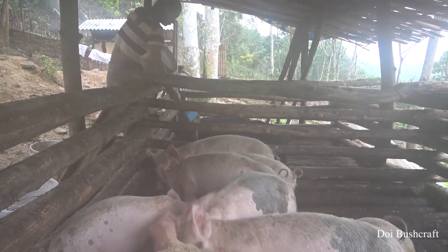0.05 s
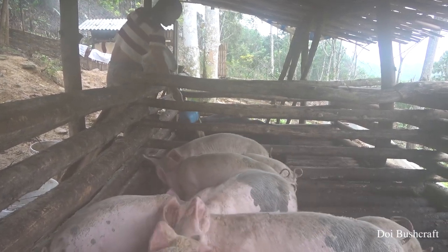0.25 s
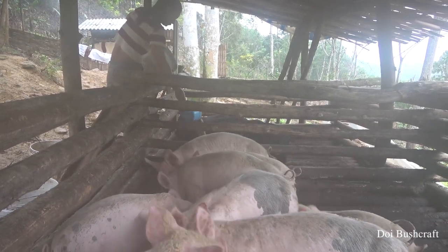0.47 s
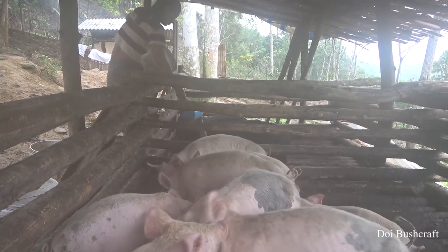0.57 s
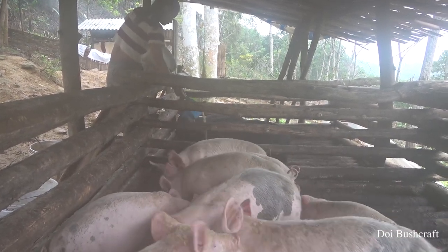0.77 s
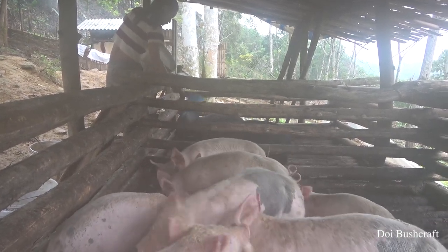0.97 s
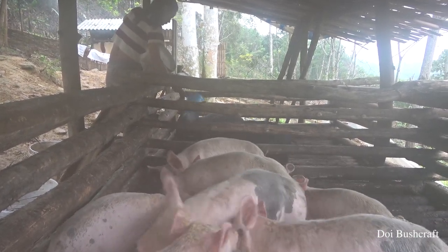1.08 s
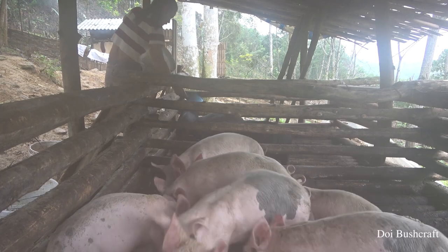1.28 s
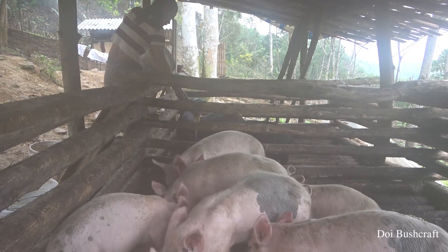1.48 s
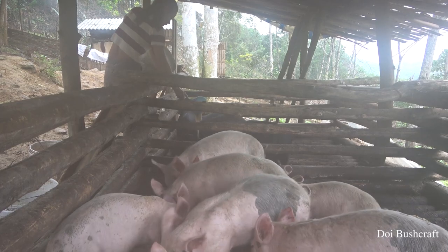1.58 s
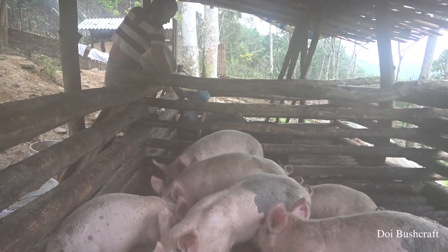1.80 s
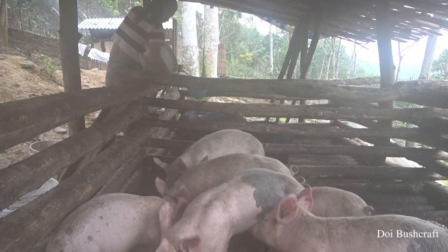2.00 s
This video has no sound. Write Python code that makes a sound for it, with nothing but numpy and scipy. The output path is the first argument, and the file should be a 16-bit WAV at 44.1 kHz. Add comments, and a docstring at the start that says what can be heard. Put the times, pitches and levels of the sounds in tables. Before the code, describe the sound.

Two loud, piercing squeals from a young pig follow a few short grunts, the second squeal longer and rougher. Then come hoof knocks on wood, snuffles and the herd's soft shuffling, heard up close in a low-roofed pen.

```python
"""A young pig squeals twice, close to a stereo microphone, in a wooden pen under a low roof.
Its voice has two oscillators, a low tone and a piercing whistle: locked at 1:3 in the first squeal,
running free in the second. Low grunts lead in; trotters knock on the planks, snouts snuffle and the
herd shuffles behind. The pen reflects voices and knocks, and the trees outside faintly echo the squeals.
The recorder's gain control flattens the peaks."""
import sys
import numpy as np
from scipy import signal
from scipy.io import wavfile
from scipy.ndimage import uniform_filter1d

SR = 44100
rng = np.random.default_rng(int(sys.argv[2]) if len(sys.argv) > 2 else 0)


def unload_wav(signal):
    """Save mono or channel-first audio to the path in sys.argv[1] as 16-bit WAV at rate SR, clipped to [-1, 1]."""
    wavfile.write(
        sys.argv[1],
        SR,
        np.round(np.clip(np.atleast_2d(signal).T, -1, 1) * 32767).astype(np.int16),
    )


N = 90404
T = np.arange(N) / SR
JITTER, JITTER_HZ, FLUTTER_DB, FLUTTER_HZ = 0.01434, 171, 13, 102   # the voice at roughness 1
GRUNT_TAIL_S = 0.0058

# First squeal, near the microphone: (time [s], whistle pitch [Hz], level [dB])
FIRST_SQUEAL = [(.303, 1960, -9.5), (.316, 2258, -21.5), (.325, 2384, -9.5), (.342, 2418, -16.5),
                (.364, 2542, -6.5), (.405, 2481, -9.5), (.435, 2469, -5), (.462, 2462, -10),
                (.487, 2402, -9), (.505, 2346, -15.5), (.522, 2297, -13), (.551, 2355, -15.5),
                (.565, 2284, -23.5), (.58, 2303, -25)]
# Its hoarseness: (time [s], roughness [0 = clean])
FIRST_HOARSENESS = [(.3, 1.19), (.33, 0.46), (.36, 0.12), (.41, 0.03), (.455, 0.18), (.49, 0.25),
                    (.53, 0.28), (.58, 0.52)]
# Its harmonics, from the first up: (level before the break [dB], level after [dB])
LOCKED_HARMONICS = [(-28, -20), (-22, -22), (0, -10.5), (-14.5, -4), (-30.5, -27), (-10, -16.5),
                    (-13.5, -11), (-29, -29), (-23.5, -12.5), (-22.5, -11.5), (-34, -27), (-42, -22.5),
                    (-34.5, -24), (-44, -36), (-52, -32), (-38, -31), (-57, -38)]
# Gruff rasps at its start: (time [s], length [s], level [dB])
ONSET_RASPS = [(.306, 0.021, -27), (.335, 0.0082, -40)]
def first_squeal(lock_at_s=.358, scoop_per_s=7.5, break_at_s=0.4707, break_s=0.022, rasp_hz=520):
    """The low tone scoops up and locks to a third of the whistle; then the voice breaks, hoarse."""
    hz, db = in_time(FIRST_SQUEAL)
    rough, = in_time(FIRST_HOARSENESS)
    broken = np.clip((T - break_at_s) / break_s + .5, 0, 1)   # energy moves up a harmonic
    whistle = oscillator(hz, JITTER * rough)
    flat_share = np.clip(scoop_per_s * (lock_at_s - T), 0, .5)
    low = (whistle - 2 * np.pi * np.cumsum(hz * flat_share) / SR) / 3
    voice = from_db(-4.5) * rough * breath(low)
    for order, (before, after) in enumerate(LOCKED_HARMONICS, start=1):
        m, n = divmod(order, 3)
        harmonic_db = before + (after - before) * broken + (n != 0) * coupling_db(FIRST_SQUEAL)
        voice += partial(m * whistle + n * low, harmonic_db, rough, order)
    rasp = rms_one(filtered(rng.standard_normal(N), [0.85 * rasp_hz, 1.3 * rasp_hz], "band"))
    return gate(FIRST_SQUEAL) * from_db(db) * voice + puffs(ONSET_RASPS, GRUNT_TAIL_S) * rasp


# Second squeal, same spot: (time [s], whistle pitch [Hz], whistle level [dB], overtone level [dB])
SECOND_SQUEAL = [(.712, 2320, -35, -33), (.735, 2391, -30, -23.5), (.752, 2420, -13, -22.5),
                 (.77, 2460, -11.5, -18), (.8, 2427, -18.5, -15), (.83, 2530, -15, -21),
                 (.87, 2436, -11, -18), (.915, 2454, -6, -15), (.935, 2376, -19, -18),
                 (.97, 2404, -12, -14.5), (1.0, 2402, -12.5, -17), (1.033, 2487, -15, -19),
                 (1.066, 2404, -11.5, -15.5), (1.1, 2408, -11, -20), (1.125, 2386, -5.5, -22),
                 (1.148, 2463, -14, -21), (1.17, 2374, -13, -25), (1.184, 2304, -22, -19),
                 (1.194, 2092, -10.5, -28.5), (1.213, 1959, -31, -37.5)]
# Its low tone: (time [s], pitch [Hz], level [dB])
FREE_LOW_TONE = [(0.72, 790, -36), (0.744, 854, -49.5), (0.754, 944, -35.5), (0.816, 974.2, -24),
                 (0.964, 1012, -11), (1.022, 989, -15), (1.032, 1011, -15), (1.04, 960, -30),
                 (1.07, 965.3, -15.5), (1.09, 966, -35), (1.134, 846, -39), (1.146, 856, -24.5),
                 (1.168, 818, -35), (1.188, 706, -29.5), (1.205, 665, -50)]
# Its hoarseness: (time [s], roughness [0 = clean])
SECOND_HOARSENESS = [(.715, 0.84), (.77, 0.26), (.83, 0.56), (.89, .3), (.935, 0.37), (.98, 0.21),
                     (1.04, 0.54), (1.11, 0.1), (1.16, 0.57), (1.2, 0.72)]
# Sum and difference tones: (whistle multiple [-], low-tone multiple [-])
MIX_TONES = [(0, 2), (0, 3), (1, -1), (1, 1), (1, 2), (-1, 4), (2, -2), (2, -1), (2, 0), (2, 1), (2, 2),
             (1, 3), (1, 4), (3, 0), (3, 1), (3, 2), (4, 0), (4, 1), (4, 2), (5, 0), (5, 1), (6, 0)]
# For each: (level against the overtones [dB], share of the low tone's level swing [-])
MIX_BALANCE = [(-17, 0.21), (-23, 0.59), (-20, -0.093), (-4, -0.12), (-28, -0.081), (-30.5, 0.64),
               (-20.5, 0.69), (-21, 0.003), (-10.5, -0.24), (-11, -0.098), (-16.5, -0.34), (-21, -0.31),
               (-25.5, 0.26), (-21, -0.61), (-16, -0.05), (-29, -0.28), (-22, 0.14), (-20, -0.85),
               (-26.5, -0.35), (-38, -0.18), (-32, -0.6), (-37, -0.73)]
def second_squeal(waver=.005, waver_hz=20.8, sway_db=5, sway_hz=12, rattle_at_s=1.165, rattle_hz=150):
    """Whistle and low tone run free and beat into sum and difference tones, ending in a coarse rattle."""
    whistle_hz, whistle_db, overtone_db = in_time(SECOND_SQUEAL)
    low_hz, low_db = in_time(FREE_LOW_TONE)
    rough, = in_time(SECOND_HOARSENESS)
    overtone_db += 0.5 * np.exp(-((T - 1.117) / 0.019) ** 2)   # a last effort brightens the call
    whistle = oscillator(whistle_hz * (1 + waver * rough * drift(waver_hz)), JITTER * rough)
    low = oscillator(low_hz * (1 + waver * rough * drift(waver_hz)), JITTER * rough)
    swing_db = low_db - np.mean(np.array(FREE_LOW_TONE)[:, 2])
    voice = partial(whistle, whistle_db - 4.13, .5 * rough) + partial(low, low_db - 1, 0.51 * rough)
    for (m, n), (db, share) in zip(MIX_TONES, MIX_BALANCE):
        mix_db = overtone_db + db + share * swing_db + (n != 0) * coupling_db(SECOND_SQUEAL)
        mix_db += sway_db * drift(sway_hz)
        voice += partial(m * whistle + n * low, mix_db, rough, order=2 * abs(m) + abs(n))
    rattle_depth = 0.2 * np.clip((T - rattle_at_s) / 0.036, 0, 1)
    rattle = 1 + rattle_depth * np.sin(oscillator(rattle_hz, jitter=.15))
    voice += from_db(overtone_db + 0.5) * rough * breath(low)
    return gate(SECOND_SQUEAL) * rattle * voice


def oscillator(hz, jitter):
    """Phase of a vibration whose pitch trembles."""
    return 2 * np.pi * np.cumsum(hz * (1 + jitter * drift(JITTER_HZ))) / SR


def partial(phase, db, rough, order=0, smear_rad=.14):
    """One tone of the voice; roughness makes it flutter and smears the higher orders most."""
    flutter = from_db(FLUTTER_DB * rough * np.tanh(drift(FLUTTER_HZ)))
    smear = smear_rad * order * rough * drift(2 * FLUTTER_HZ)
    return np.sqrt(2) * from_db(db) * flutter * np.sin(phase + smear + rng.uniform(0, 2 * np.pi))


def coupling_db(call, start_db=-24.5, swell_s=0.036):
    """The whistle leads; overtones that involve the low tone swell in after it."""
    return start_db * np.clip(1 - (T - call[0][0]) / swell_s, 0, 1)


def gate(call, attack_s=0.012, release_s=0.0042):
    """Opens at the start of a call and dies away after its end."""
    return np.clip((T - call[0][0]) / attack_s, 0, 1) * np.exp(-np.maximum(T - call[-1][0], 0) / release_s)


# Resonances of the pig's throat: (frequency [Hz], width [Hz], level [dB])
THROAT_BANDS = [(1835, 150, 3.5), (2500, 170, 0), (2920, 550, 0), (5510, 300, -1), (7480, 500, -1.5),
                (11100, 1200, -30)]
def breath(phase, low_cut_hz=1380):
    """Turbulence chopped by each cycle and coloured by the throat."""
    rush = rng.standard_normal(N) * (1 + 0.23 * np.cos(phase))
    throat = np.zeros(N)
    for k, (hz, width, db) in enumerate(THROAT_BANDS):
        band = filtered(rush, [hz - width / 2, hz + width / 2], "band", order=1)
        throat += (-1) ** k * from_db(db) * band
    return rms_one(filtered(throat, low_cut_hz, "high", order=4)) * from_db(2 * drift(40))


# Low grunts inside the pen: (time [s], length [s], level [dB])
PEN_GRUNTS = [(.081, 0.02, -25.5), (.113, 0.012, -27), (.18, 0.025, -24.5), (.212, 0.0082, -15.5),
              (.225, 0.011, -20.5), (.24, 0.028, -28.5), (.576, 0.035, -32.5), (.665, 0.017, -44.5),
              (1.364, 0.0068, -37.5), (1.888, 0.0082, -42)]
def grunts(pitch_hz=240, rasp_db=-12):
    """Short closed-mouth grunts: one wavering nasal tone with a low rasp."""
    tone = np.sqrt(2) * np.sin(oscillator(pitch_hz, jitter=.05))
    rasp = rms_one(filtered(rng.standard_normal(N), [130, 380], "band"))
    return puffs(PEN_GRUNTS, GRUNT_TAIL_S) * (tone + from_db(rasp_db) * rasp)


# Trotters striking the pen's planks: (time [s], level [dB])
TROTTER_KNOCKS = [(1.2219, -5.5), (1.2261, -11), (1.257, -38), (1.434, -64), (1.503, -33.5), (1.628, -30.5),
                  (1.912, -30.5), (2.001, -27.5)]
# Modes of a plank: (frequency [Hz], level [dB], time to fall 60 dB [s])
PLANK_MODES = [(253, -19, 0.036), (522, -28, 0.033), (774, -20, 0.036), (1307, -6, 0.019), (1467, -9, .05),
               (1920, -12.5, 0.029), (2532, -11.5, 0.025), (3320, -19, 0.051), (5940, -20.5, .025)]
def knocks(crack_db=-10, crack_s=0.0062):
    """Each knock is a brief crack and rings the plank's modes."""
    out = np.zeros(N)
    for start, db in TROTTER_KNOCKS:
        age = np.maximum(T - start, 0)
        ring = sum((-1) ** k * from_db(level + rng.normal() - 60 * age / t60) * np.sin(2 * np.pi * hz * age)
                   for k, (hz, level, t60) in enumerate(PLANK_MODES))
        crack = filtered(rng.standard_normal(N), 6100, "low") * np.exp(-age / crack_s) * (T > start)
        out += from_db(db) * (ring + from_db(crack_db) * crack)
    return filtered(out, 235, "high")


# Snuffles and scuffs, dry at the microphone: (time [s], length [s], level [dB])
SNUFFLES = [(.08, 0.0087, -27), (.145, 0.048, -34), (.18, 0.017, -35), (1.497, 0.011, -36),
            (1.54, 0.015, -49), (1.732, 0.011, -27), (1.966, 0.024, -40.5)]
# Their colour: (frequency [Hz], band gain [dB])
SNUFFLE_BANDS = [(240, -37), (400, -1), (1250, -5.5), (2700, -1.5), (4200, -9), (5110, -3.5), (7700, -9),
                 (9960, -23), (10900, -18), (15000, -27)]
def snuffles():
    """Snouts let out short puffs of hiss."""
    return puffs(SNUFFLES, tail_s=0.025) * banded_noise(SNUFFLE_BANDS, patchy_db=5.5, flicker_hz=90)


# The herd moving about in the background: (time [s], level [dB])
HERD_LEVEL = [(0, -28.5), (.07, -34), (.13, -34), (.24, -29.5), (.3, -34), (.38, -43.5), (.65, -37.5),
              (1.25, -41), (1.34, -48), (1.45, -44), (1.56, -48.5), (1.6, -55.5), (1.64, -47),
              (1.71, -47.5), (1.8, -46), (1.86, -46), (1.92, -43), (1.96, -49.5), (2.04, -42)]
# Its colour: (frequency [Hz], band gain [dB])
HERD_BANDS = [(18, -46), (30, -12), (114, -7.5), (284, -4.5), (691, -8.5), (945, -3), (1440, -8.5),
              (2300, -10), (3680, -9), (4540, -12.5), (7650, -14.5), (8500, -21), (15500, -27.5)]
def shuffling():
    """Trotters shuffle on the planks: broad, patchy noise that swells and sinks."""
    db, = in_time(HERD_LEVEL)
    return from_db(db) * banded_noise(HERD_BANDS, patchy_db=3.0, flicker_hz=32.4)


# Low background of the place: (frequency [Hz], band gain [dB])
RUMBLE_BANDS = [(25, -29), (65, 39), (110, 4.5), (250, 6.5), (600, -31), (3000, -30)]
def rumble():
    """A very faint rumble lies under everything."""
    return from_db(-82.5) * banded_noise(RUMBLE_BANDS, patchy_db=2, flicker_hz=6)


# Likeness of the microphone's two sides: (frequency [Hz], left-right correlation [-])
STEREO_LIKENESS = [(40, 0.72), (250, 0.92), (1500, 1), (4000, 1), (8000, 0.8), (14000, 0.94)]
def banded_noise(spectrum, patchy_db, flicker_hz):
    """Half-octave bands of stereo noise, each with its own flicker; rms 1."""
    edges = 22 * 2 ** np.arange(0, 9.6, .5)
    shared_flicker = drift(flicker_hz)
    white = rng.standard_normal((2, 2, N))
    out = np.zeros((2, N))
    for k, (low, high) in enumerate(zip(edges, edges[1:])):
        mid, side = filtered(white[k % 2], [low, high], "band")
        hz = np.sqrt(low * high)
        alike = np.clip(at_hz(STEREO_LIKENESS, hz), -1, 1)
        gain = from_db(at_hz(spectrum, hz) + patchy_db * (0.35 * shared_flicker + drift(flicker_hz)))
        out += gain * (np.sqrt(1 + alike) * mid + np.sqrt(1 - alike) * side * [[1], [-1]])
    return rms_one(out)


def pen(x, t60_s=0.19, build_s=0.0013, reflections_db=-9):
    """Direct sound plus dense reflections from the planks and low roof around the microphone."""
    age = T[:SR // 2]
    tails = filtered(rng.standard_normal((2, len(age))), 16400, "low", order=1)
    tails *= from_db(-60 * age / t60_s) * (1 - np.exp(-age / build_s))
    # A close reflection makes the treble differ between the microphone's two ports.
    spread = from_db(-6.5) * np.interp(T - 0.00038, T, filtered(x, 7200, "high"))
    return x + from_db(reflections_db) * reverberate(x, tails) + spread * [[1], [-1]]


def woods(x, t60_s=1.73, centre_hz=3030, echo_db=-36):
    """A long thin tail scattered back from the trees, farther off."""
    tails = filtered(rng.standard_normal((2, N)), [centre_hz / np.sqrt(2), centre_hz * np.sqrt(2)], "band")
    return from_db(echo_db) * reverberate(x, tails * from_db(-60 * T / t60_s))


def reverberate(x, tails, width=0.16):
    """Stereo echo from a mid tail and a side tail."""
    mid, side = [signal.fftconvolve(x, tail / np.linalg.norm(tail))[:N] for tail in tails]
    return mid + width * side * [[1], [-1]]


def puffs(rows, tail_s):
    """Each puff swells for half its length, holds, then dies away."""
    return sum(from_db(db) * np.clip(2 * (T - start) / length, 0, 1)
               * np.exp(-np.maximum(T - start - 0.75 * length, 0) / tail_s) for start, length, db in rows)


def drift(hz):
    """Smooth random wander of spread 1."""
    pole = np.exp(-16 * np.pi * hz / SR)
    slow = signal.lfilter([1], [1, -2 * pole, pole * pole], rng.standard_normal(N // 8 + 4002))[4000:]
    return np.interp(np.arange(N) / 8, np.arange(len(slow)), rms_one(slow))


def filtered(x, hz, kind, order=2):
    """Butterworth filter."""
    return signal.sosfilt(signal.butter(order, np.clip(hz, 10, .47 * SR), kind, fs=SR, output="sos"), x)


def in_time(rows):
    """Each column of a curve at every sample."""
    times, *columns = np.transpose(rows)
    return [np.interp(T, times, column) for column in columns]


def at_hz(points, hz):
    """Read a spectrum on a log-frequency axis."""
    return np.interp(np.log(hz), np.log(np.array(points)[:, 0]), np.array(points)[:, 1])


def from_db(db):
    """Decibels to gain."""
    return 10 ** (np.asarray(db) / 20)


def rms_one(x):
    """Scale to unit rms."""
    return x / np.sqrt(np.mean(x ** 2) + 1e-20)


def scene():
    """At the microphone: voices and knocks in the pen, over the shuffling herd."""
    background = shuffling() + snuffles() + rumble()
    squeals = first_squeal() + second_squeal()
    return pen(squeals + grunts() + knocks()) + woods(squeals) + background


def record(dry, limit_db=-13.5, share=0.66, window_s=0.0056, release_db_per_s=128, cutoff_hz=15300):
    """The recorder's gain control flattens the squeals; the top is cut steeply."""
    power = uniform_filter1d(np.mean(dry ** 2, axis=0), int(window_s * SR))
    excess_db = np.maximum(10 * np.log10(np.abs(power) + 1e-12) - limit_db, 0)
    fall_db = release_db_per_s * T
    held_db = np.maximum.accumulate(excess_db + fall_db) - fall_db
    top_cut = signal.ellip(10, .1, 80, cutoff_hz, fs=SR, output="sos")
    return signal.sosfilt(top_cut, dry * from_db(-share * held_db))


dry = scene()
out = record(dry)
unload_wav(out)
```